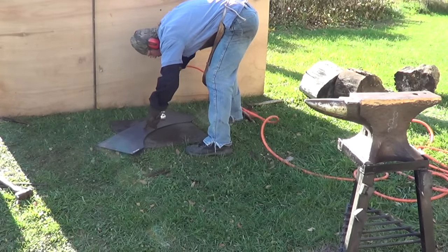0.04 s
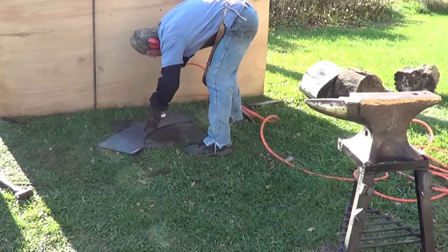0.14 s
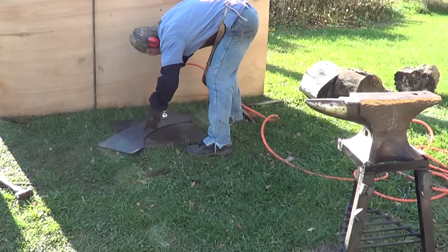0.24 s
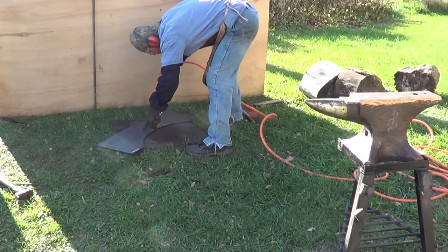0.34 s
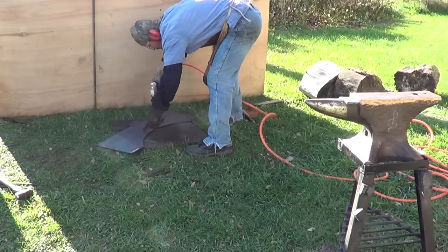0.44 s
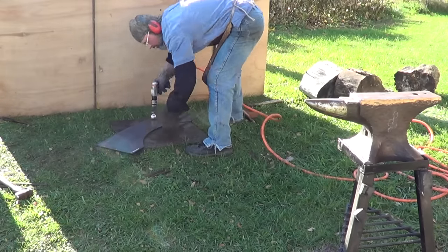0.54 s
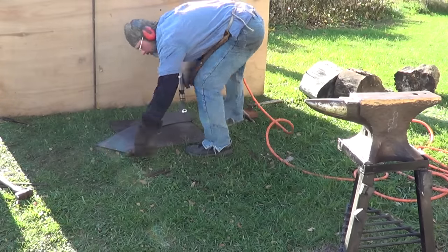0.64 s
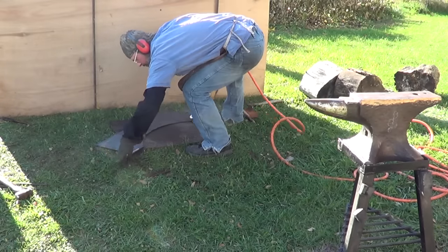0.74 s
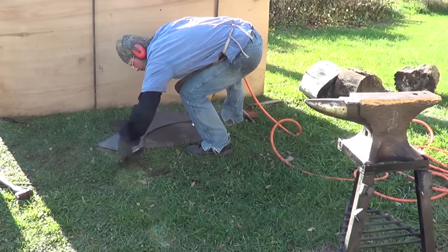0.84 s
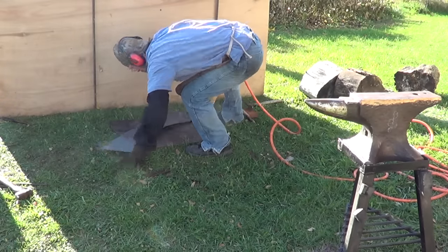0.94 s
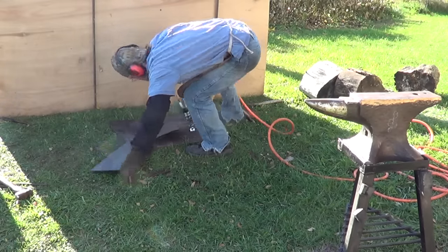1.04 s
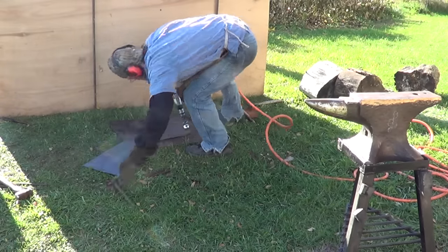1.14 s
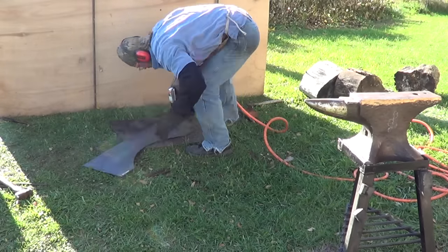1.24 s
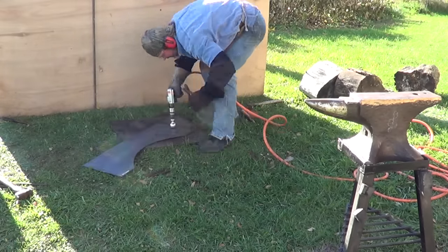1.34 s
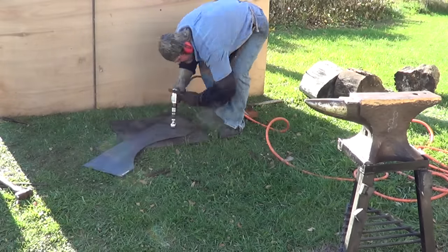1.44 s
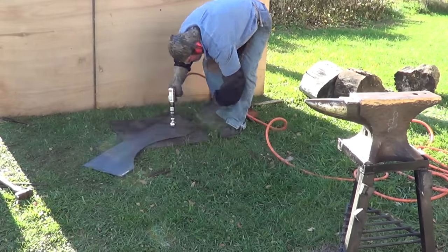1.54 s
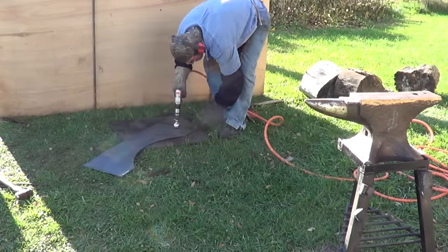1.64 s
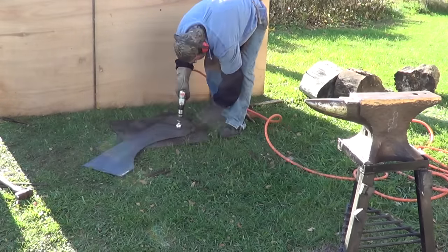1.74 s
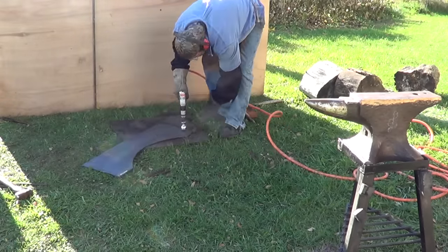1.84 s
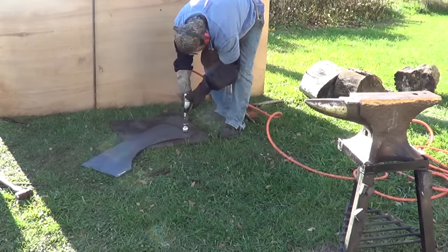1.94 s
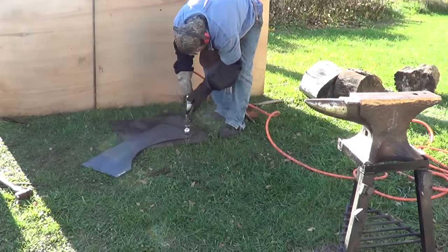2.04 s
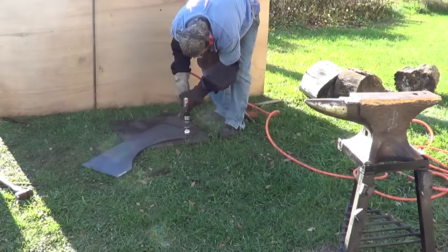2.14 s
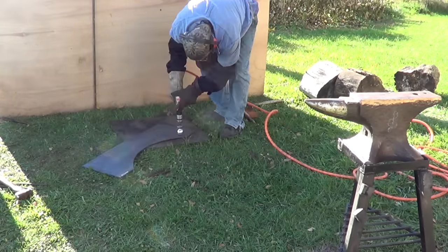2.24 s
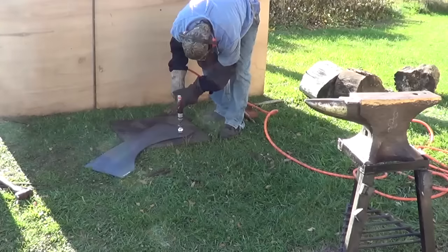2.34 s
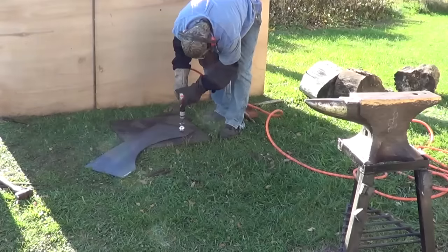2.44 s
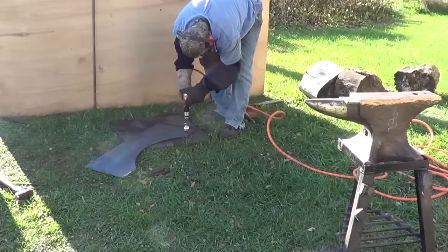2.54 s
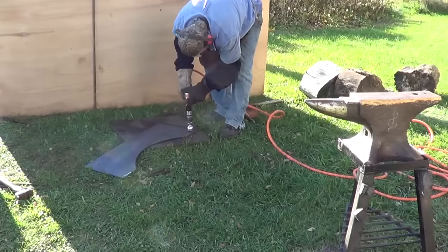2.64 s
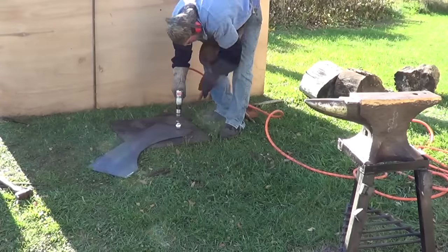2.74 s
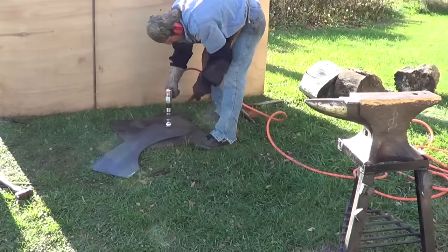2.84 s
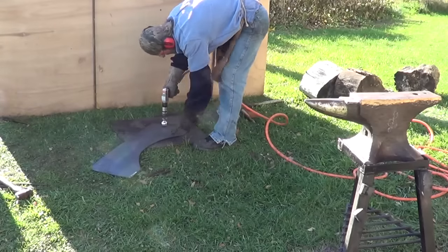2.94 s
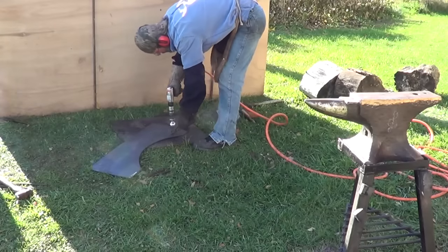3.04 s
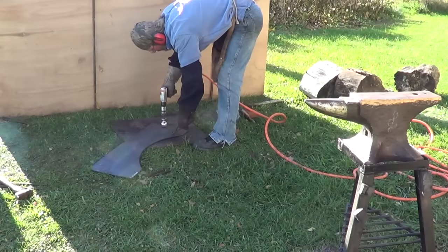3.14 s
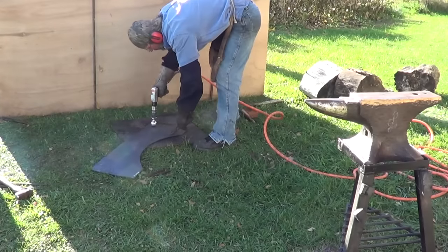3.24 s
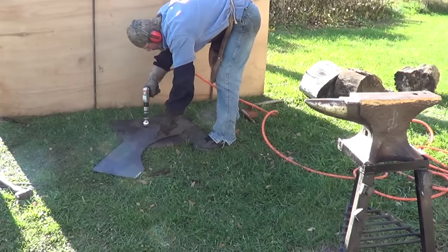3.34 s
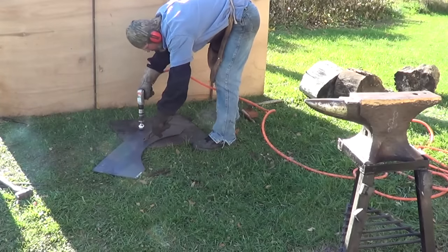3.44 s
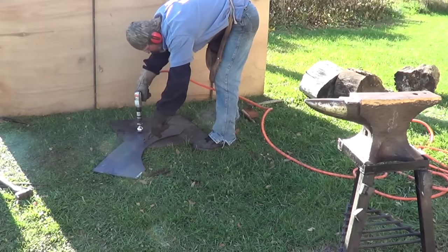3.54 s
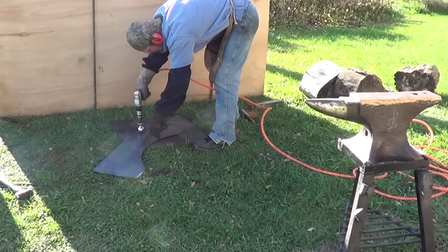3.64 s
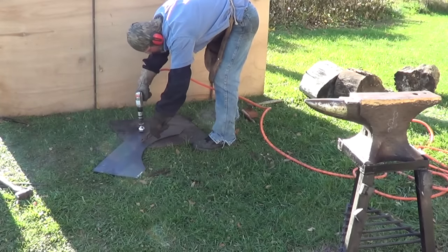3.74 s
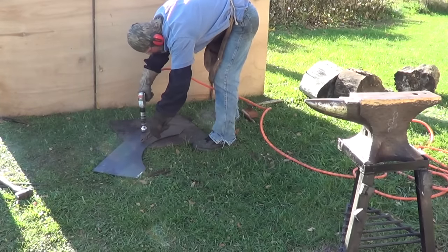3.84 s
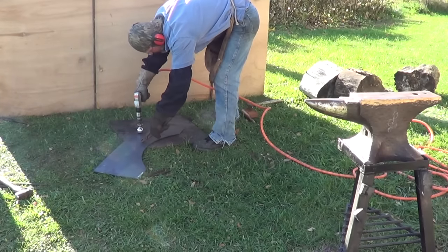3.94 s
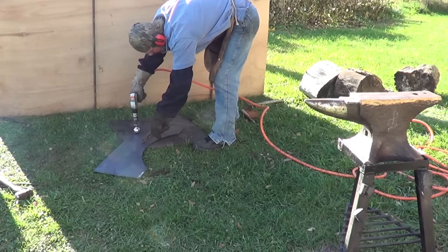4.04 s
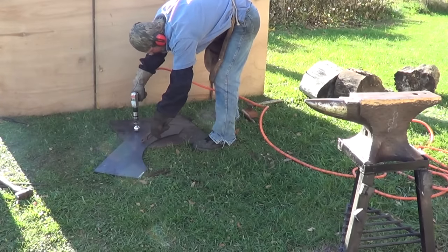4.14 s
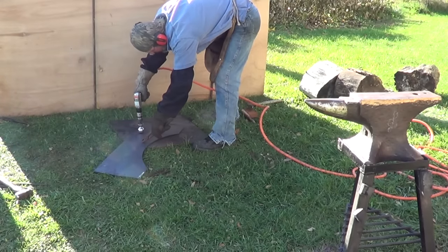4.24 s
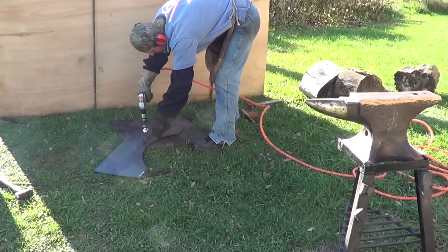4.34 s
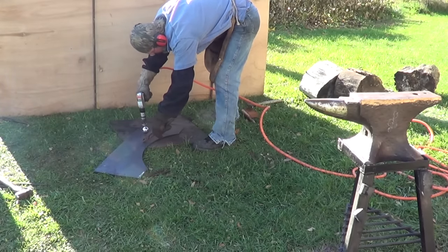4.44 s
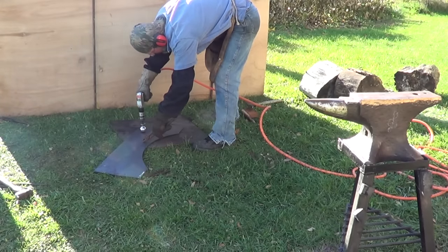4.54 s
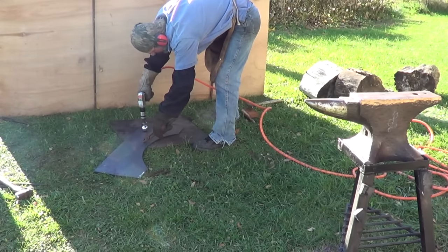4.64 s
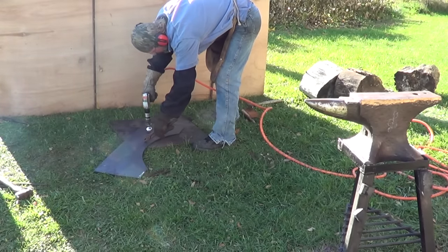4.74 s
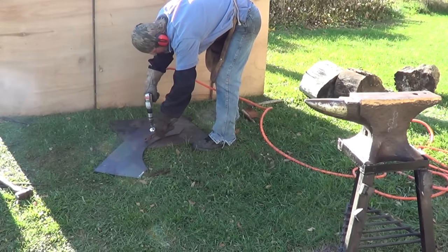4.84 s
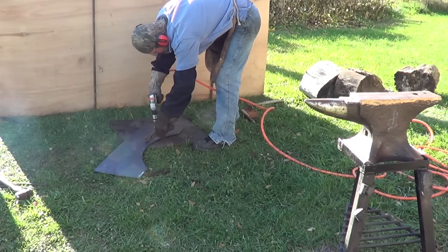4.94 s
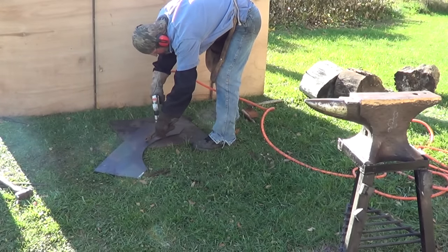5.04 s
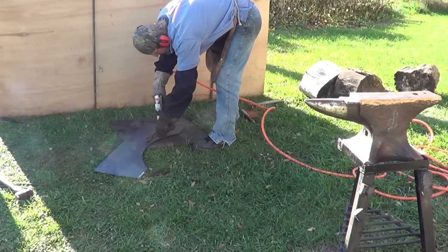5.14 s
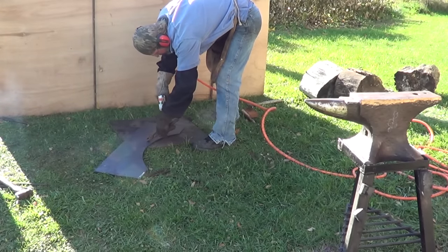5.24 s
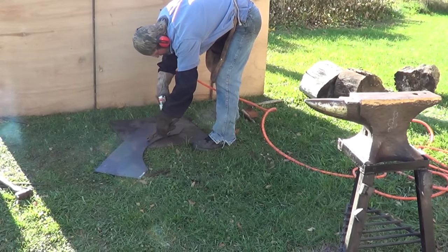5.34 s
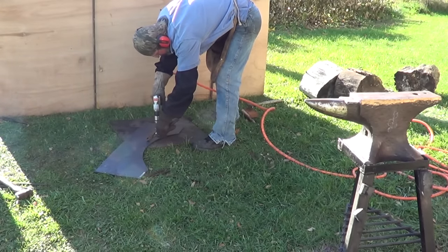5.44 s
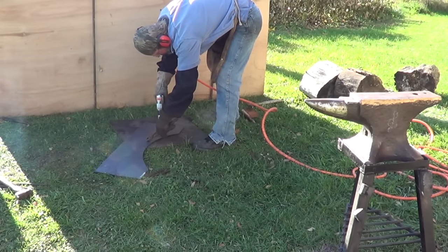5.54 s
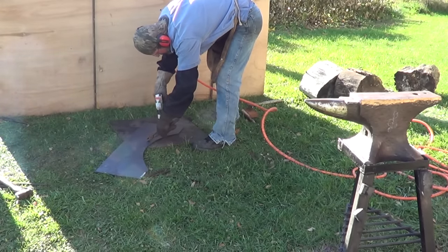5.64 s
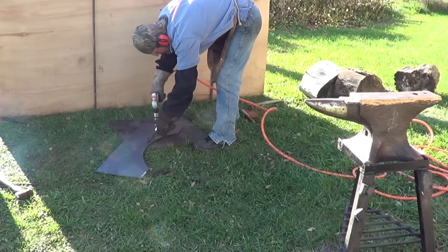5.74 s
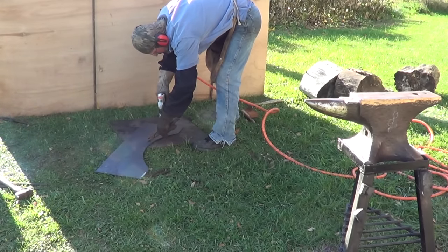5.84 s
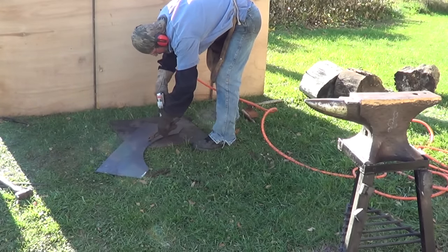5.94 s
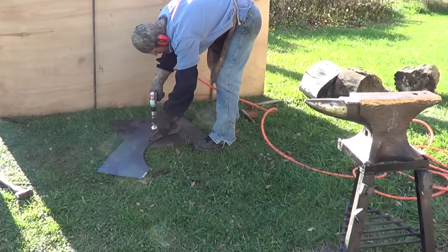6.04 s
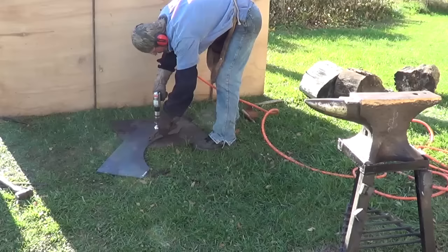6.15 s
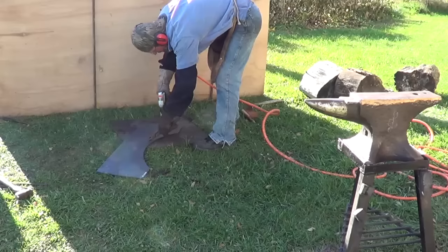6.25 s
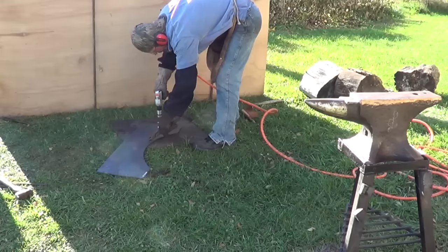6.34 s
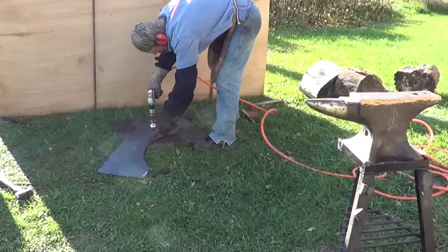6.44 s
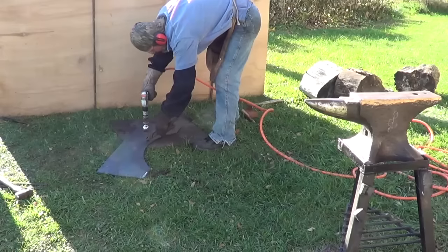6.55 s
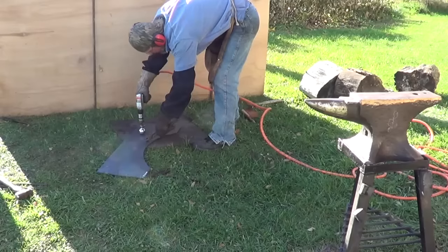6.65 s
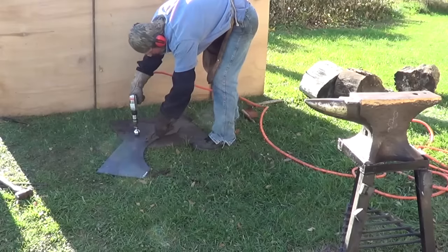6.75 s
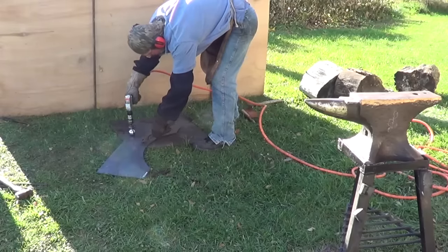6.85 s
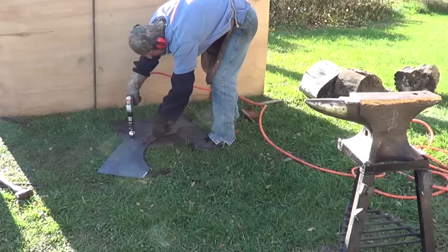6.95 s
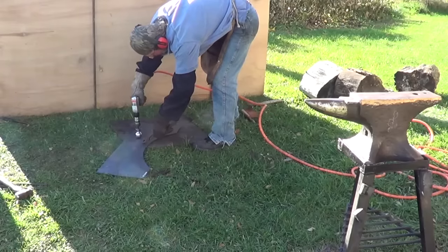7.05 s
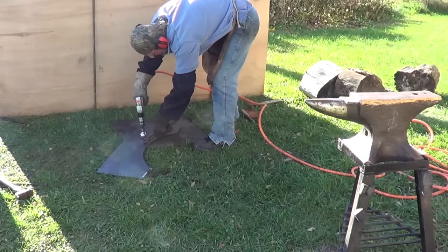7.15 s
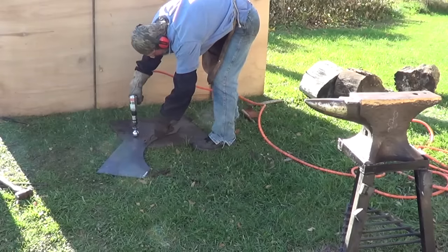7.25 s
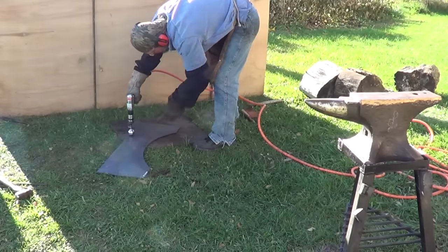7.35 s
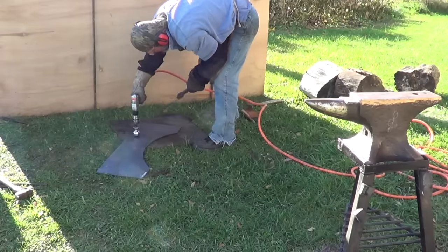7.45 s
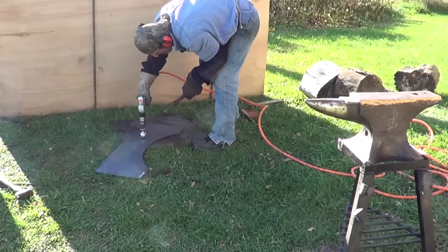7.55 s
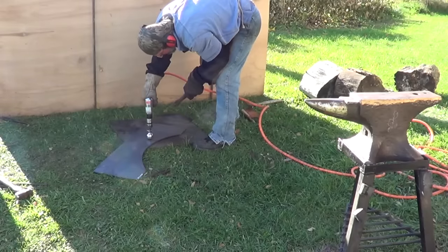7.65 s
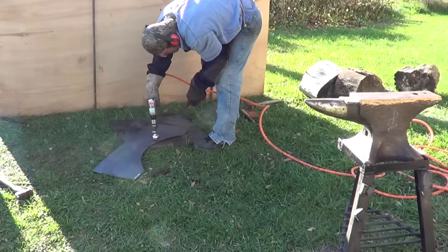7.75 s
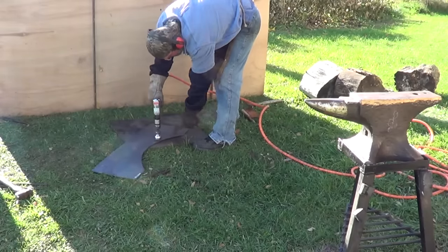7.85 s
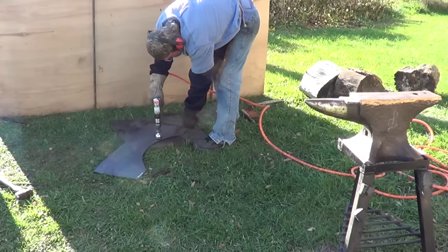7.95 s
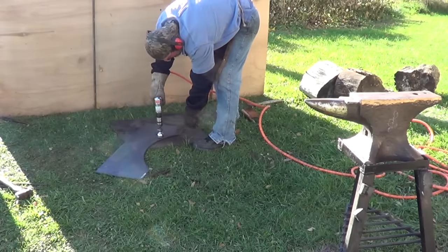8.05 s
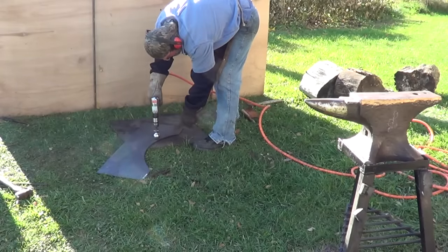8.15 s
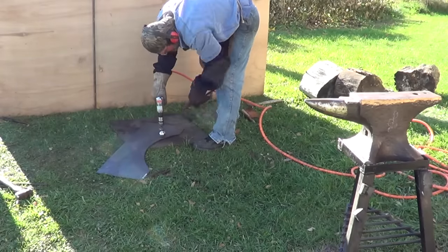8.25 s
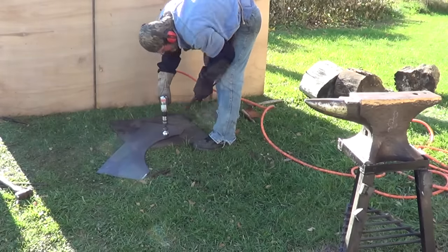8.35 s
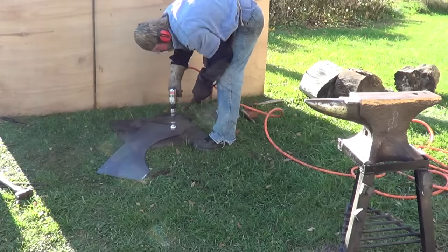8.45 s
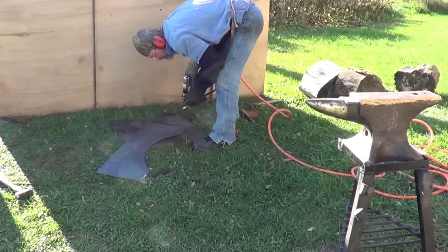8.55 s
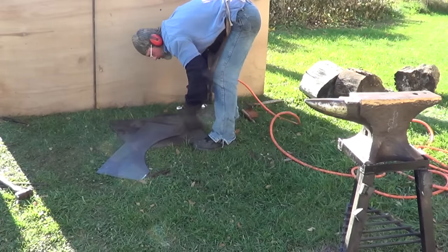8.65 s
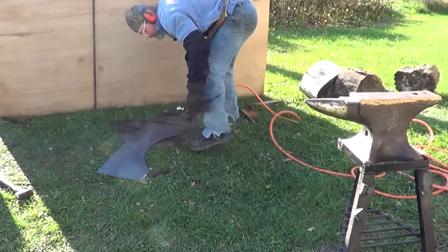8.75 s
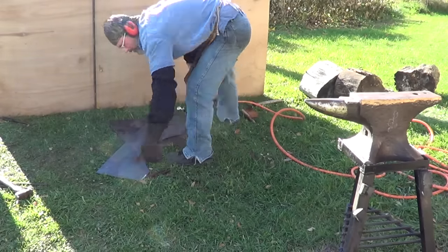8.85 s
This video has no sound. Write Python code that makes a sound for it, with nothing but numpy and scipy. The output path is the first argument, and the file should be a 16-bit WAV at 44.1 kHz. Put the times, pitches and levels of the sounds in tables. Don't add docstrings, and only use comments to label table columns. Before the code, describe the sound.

A short burst of very rapid metal hammering, about two hundred strokes a second, fused into a rough rattling buzz. A pause of about a second follows with faint ticks, a hard scrape and loud clanks of loose sheet steel, while leaking air hisses and hums. The hammering returns, shriller and longer, wavering in tone until it lifts off. Open yard, camera a few metres away.

```python
import sys
import numpy as np
from scipy import signal
from scipy.fft import rfft, irfft
from scipy.io import wavfile
from scipy.ndimage import uniform_filter1d

SR = 44100
rng = np.random.default_rng(int(sys.argv[2]) if len(sys.argv) > 2 else 0)


def wrap_up_sound(samples):
    columns = np.atleast_2d(samples).T
    tamed = np.clip(columns, -1, 1)
    steps = np.round(tamed * 32767).astype(np.int16)
    wavfile.write(sys.argv[1], SR, steps)


def gain_from_db(level_db):
    decades = np.asarray(level_db, float) / 20
    return 10 ** decades


N = 392030
EARLY = slice(0, 2 * SR)


def evened(x):
    return x / np.sqrt(np.mean(x ** 2) + 1e-20)


def read(points, hz):
    f, value = np.transpose(points)
    return np.interp(np.log(hz + 1), np.log(f + 1), value)


def curve(rows):
    return np.interp(np.arange(N) / SR, *np.transpose(rows))


def span(start_s, end_s, level_db, fade_db=0):
    t = np.arange(N) / SR
    progress = np.clip((t - start_s) / (end_s - start_s), 0, 1)
    return ((t >= start_s) & (t < end_s)) * gain_from_db(level_db + fade_db * progress)


def drift(top_hz, count=1, lowest=.1):
    t = np.arange(0, N + 128, 64) / SR
    hz = np.geomspace(lowest, 1, 24) * top_hz
    phase = hz[:, None] * t + rng.random((count, 24, 1))
    waves = np.sin(2 * np.pi * phase) / np.sqrt(hz)[:, None]
    return np.array([np.interp(np.arange(N) / SR, t, evened(w)) for w in waves.sum(1)])


def stack(orders, turns, flutter_db, scatter=1):
    waver = gain_from_db(flutter_db * drift(85, count=6))[:, :len(turns)]
    out = np.zeros(len(turns))
    for j, (order, level_db) in enumerate(orders):
        sine = np.sin(2 * np.pi * (order * turns + scatter * rng.random()))
        out += gain_from_db(level_db) * waver[j % 6] * sine
    return evened(out)


def ring(drive, hz, width_hz):
    r = np.exp(-np.pi * 1.25 * width_hz / SR)
    pole = [1, -r * np.exp(2j * np.pi * hz / SR)]
    return 2 * signal.lfilter([(1 - r) ** 2], np.convolve(pole, pole), drive).real


def ports(x, lean, lead):
    hz, sides = np.fft.rfftfreq(N, 1 / SR), np.array([[.5], [-.5]])
    turned = np.exp(1j * sides * read(lead, hz))
    return irfft(rfft(x) * gain_from_db(sides * read(lean, hz)) * turned, N)


# freq_hz, likeness_0_to_1
PORT_LIKENESS = [(60, .98), (180, 0.57), (550, 0.93), (1650, 0.9), (4970, 0.82), (8500, 0.9), (15000, 0.73)]
# freq_hz, left_minus_right_db
PORT_LEAN = [(60, 0.0), (180, -0.45), (550, -0.2), (1650, -0.75), (4000, -1.4), (8000, 0.91), (15000, 1.3)]


def pair(frames, hz):
    a, b, c, d = rng.standard_normal((frames, len(hz), 4)).T
    same = np.clip(read(PORT_LIKENESS, hz), 0, 1)[:, None]
    lean = gain_from_db(read(PORT_LEAN, hz) / 2)[:, None]
    left = a + 1j * b
    right = same * left + np.sqrt(1 - same ** 2) * (c + 1j * d)
    return np.array([left * lean, right / lean])


def noise(points, share=1, streak_db=0):
    hz, frames = np.fft.rfftfreq(1024, 1 / SR), N // 256 + 5
    streaks = uniform_filter1d(rng.standard_normal((len(hz), frames)), size=140, axis=1)
    streaks = evened(uniform_filter1d(streaks, size=40, axis=1))
    depth_db = streak_db * np.clip(hz / 3000, .3, 1)[:, None]
    z = pair(frames, hz) * (gain_from_db(read(points, hz)) * share)[:, None] * gain_from_db(depth_db * streaks)
    return evened(signal.istft(z, nperseg=1024, noverlap=768)[1][:, :N])


# start_s, end_s, force_db, shrillness_db
BURSTS = [
    (0, 0.593, -17.5, 1.5),
    (1.859, 8.527, -19.5, 3.5),
]


def camera_gain_db():
    duck_db, release_db, creep_db_per_s, duck_s = -19, -11.5, 12.5, .004
    t = np.arange(N) / SR
    quiet = sum(span(a, b, 0) for a, b, *_ in BURSTS) == 0
    since_s = t - np.maximum.accumulate(t * ~quiet)
    keep = np.exp(-1 / (duck_s * SR))
    target_db = quiet * (release_db - duck_db + creep_db_per_s * since_s)
    return duck_db + signal.lfilter([1 - keep], [1, -keep], target_db)


# time_s, rate_hz
HUM_HZ = [(0, 231.25), (2, 231.25), (8.9, 231.5)]
# order, level_db
BUZZ_PARTIALS = [(1, -16), (2, -5), (3, -17), (4, -5), (5, -9), (6, -8), (7, -5), (8, 0), (9, -11),
                 (10, -6), (11, -7), (12, -20), (13, -4), (14, -9), (15, -8), (16, -9), (17, -17), (18, -9),
                 (19, -9), (20, -13), (21, -16), (22, -14), (23, -16), (24, -10), (25, -14), (26, -15),
                 (28, -15), (29, -18), (31, -11), (35, -15), (36, -16), (38, -16), (41, -13)]
# freq_hz, density_db_per_hz
HISS = [(25, -29), (60, -25), (130, -11.5), (300, -10.5), (600, -9), (927, -6), (1510, -8.5), (1880, -4),
        (2820, -9.5), (6000, -8), (10400, -8), (12500, -13), (15200, -15.5), (16500, -20)]
# freq_hz, width_hz, level_db
HAZY_TONES = [(5630, 90, -47), (7170, 60, -57), (9480, 60, -53)]
# time_s, level_db
VALVE_LINE_DB = [(0, -62), (8.9, -47)]
# freq_hz, left_minus_right_db
HUM_LEAN = [(60, -0.5), (130, 0.0), (290, -0.5), (640, -0.5), (1410, -1.0), (3100, -5.5), (6820, -5.5),
            (15000, -3.5)]
# freq_hz, left_lead_rad
HUM_LEAD = [(0, 0), (1810, -0.1), (2070, 0.5), (2330, -0.0), (7490, 0.1), (7750, 0.5), (10900, -0.4),
            (16500, 0.2)]


def air_supply():
    turns = np.cumsum(curve(HUM_HZ)) / SR
    hiss = gain_from_db(-43.0) * noise(HISS) * (1 + 0.13 * np.cos(2 * np.pi * turns))
    for hz, width_hz, level_db in HAZY_TONES:
        hiss = hiss + gain_from_db(level_db + 18) * ring(rng.standard_normal(N), hz, width_hz)
    buzz = gain_from_db(-37.0) * stack(BUZZ_PARTIALS, turns + 0.0015 * drift(30)[0], 0.37)
    buzz += gain_from_db(curve(VALVE_LINE_DB)) * np.sin(2 * np.pi * 17.5 * turns)
    return gain_from_db(camera_gain_db()) * (hiss + ports(buzz, HUM_LEAN, HUM_LEAD))


# time_s, share_0_to_1
ROCKING = [(0, .2), (2.3, .25), (2.9, .6), (3.15, 1), (3.8, .85), (4.4, .6), (5.2, .5), (6.7, .55),
           (7.0, .6), (7.7, .4), (8.6, .4)]


def bounce():
    rocking = evened(ring(rng.standard_normal(N), hz=30.5, width_hz=7))
    return curve(ROCKING) * (np.minimum(rocking - .4, 0) + 0.5)


# time_s, depth_db
SKIPS = [
    (2.18, -2),
    (3.122, 6),
    (3.16, 6),
    (3.207, 4),
    (3.245, 4),
    (6.388, 24),
    (7.32, 4),
    (8.47, 0),
]


def skips():
    seat_s, half_length_s = 0.0072, .006
    t = np.arange(N) / SR
    seating = 4.0 * np.exp(-abs(t - BURSTS[-1][0]) / seat_s)
    return seating + sum(db * np.exp(-((t - s) / half_length_s) ** 2) for s, db in SKIPS)


# time_s, lean_db
LEANING = [(0, 4), (1.865, 6), (1.96, -3), (2.23, -2.5), (2.29, 4.5), (2.34, -1), (2.65, -0.5), (2.95, 3),
           (4.0, 3), (4.5, 6), (5.1, 1.5), (5.6, 2.5), (6.4, 7.5), (6.85, 3), (7.6, 6.5), (7.8, 0),
           (8.52, -1)]
# time_s, shrill_db
TILT = [(0, 1), (.35, 4), (.58, 4.5), (1.86, 2), (2.3, 1), (2.9, 2), (3.2, 1), (3.7, 3), (4.4, -0.5),
        (5.1, 2), (5.5, -1), (6.0, 1), (6.7, 2), (7.55, 1.5), (7.68, 3), (7.95, 1.5), (8.05, 3), (8.53, 1)]
# start_s, end_s, thud_db, fade_db, low_rattle_db
STANCES = [
    (0, .575, -32, -9, -29),
    (1.862, 2.3, -34, 0, -37.5),
    (2.3, 8.527, -35, 0, -29.5),
]


def bit_force(rocking):
    force_per_db, shrill_per_db, weight_per_db = 0.1666, -0.07, -0.24
    wobble_db, shrill_wobble_db, skip_shrill = -0.9, 2, 1.4
    lean, skip = curve(LEANING), skips()
    wobble = -np.maximum(drift(45, count=2, lowest=0.45), 0)
    middle_db = force_per_db * lean - skip + wobble_db * wobble[0] + 0.25 * rocking
    shrill_db = curve(TILT) + 0.8 * rocking + shrill_per_db * lean - skip_shrill * skip
    shrill_db += shrill_wobble_db * (wobble[0] + .5 * wobble[1])
    low_db = weight_per_db * lean + 3.5 * rocking
    return [gain_from_db(middle_db) * sum(span(a, b, db) for a, b, db, _ in BURSTS),
            gain_from_db(shrill_db) * sum(span(a, b, db + up_db) for a, b, db, up_db in BURSTS),
            gain_from_db(low_db) * sum(span(a, b, rattle_db) for a, b, _, _, rattle_db in STANCES)]


# freq_hz, left_minus_right_db
TOOL_LEAN = [(60, 0.0), (150, 0.0), (380, -1.4), (950, -0.86), (2380, -1.9), (5980, 0.94), (15000, 1.0)]
# freq_hz, left_lead_rad
TOOL_LEAD = [(0, -0.3), (1550, -0.45), (2410, -0.48), (9910, 0.0), (10300, -0.26), (11600, -0.35),
             (16500, 0.11)]
# order, level_db
THUD_PARTIALS = [
    [(1, -40), (2, -26), (3, -7.5), (4, -8.5), (5, -32), (6, -7.5), (7, 0.5), (8, -5.5), (9, -4), (10, -3),
     (11, -18), (12, -4)],
    [(1, -32), (2, -14), (3, -11), (4, 1.5), (5, 2), (6, 0), (7, -21), (8, 1), (9, 1.5), (10, -13),
     (11, -1), (12, -7), (13, -4), (14, -9)],
    [(1, -51), (2, -14), (3, -11.5), (4, -19), (5, 3), (6, 7.5), (7, 10.5), (8, -7), (9, 2), (10, 0),
     (11, -10), (12, -6), (13, -12), (14, -7), (15, -8)],
]


def piston(turns, rocking):
    shaken, out = turns + 0.012 * drift(60)[0], np.zeros(N)
    for row, orders in zip(STANCES, THUD_PARTIALS):
        part = slice(round(row[0] * SR), round(row[1] * SR))
        out[part] += span(*row[:4])[part] * stack(orders, shaken[part], 1.7, scatter=.12)
    wobble_db = -0.06 * drift(60, lowest=0.55)[0]
    return out * gain_from_db(curve(LEANING) + wobble_db + 6 * rocking - 6.5)


def chatter(turns):
    stroke = turns.astype(int)
    strength_db = 0.056 * rng.standard_normal(stroke[-1] + 1)[stroke] + 0.041 * drift(140)[0]
    after_blow = .27 + np.exp(-(turns % 1) / .2)
    rattle = (rng.random(N) < 3000 / SR) * np.clip(rng.standard_normal(N), -2, 2)
    rattle += 1.25 * np.diff(stroke, prepend=0)
    return evened(gain_from_db(strength_db) * after_blow * rattle)


# freq_hz, density_db_per_hz
PLATE_SPECTRUM = [(25, -57), (100, -57), (300, -37), (600, -39), (850, -15.5), (1100, -21), (1600, -21),
                  (2200, -16.5), (3300, -6.5), (4500, -3), (6200, -4), (7500, 1), (14000, -6.5),
                  (16500, -5.5)]
PLATE_T60_S = (0.1, 0.083, 0.16)
BAND_EDGES_HZ = (2500, 10500)


def dense_modes(drives):
    hz = np.fft.rfftfreq(1024, 1 / SR)
    low = 1 / (1 + (hz / BAND_EDGES_HZ[0]) ** 8)
    high = 1 - 1 / (1 + (hz / BAND_EDGES_HZ[1]) ** 16)
    bands = []
    for drive, share, t60_s in zip(drives, (1 - low - high, high, low), PLATE_T60_S):
        power = drive ** 2
        keep = np.exp(-2 * np.log(1000) / (t60_s * SR))
        stored = signal.lfilter([1 - keep], [1, -keep], power, zi=[np.mean(power[:2000])])[0]
        tick = 0.097 * uniform_filter1d(power, size=12)
        streaked = noise(PLATE_SPECTRUM, np.sqrt(abs(share)), streak_db=2.8)
        bands.append(np.sqrt(abs(stored + tick)) * streaked)
    no_bass = signal.butter(3, 450, "high", fs=SR, output="sos")
    return signal.sosfilt(no_bass, sum(bands))


# freq_hz, width_hz, level_db
FIRST_RINGS = [(2120, 120, -6), (3205, 70, -2), (3608, 55, -1), (4010, 90, -4), (4520, 55, -4),
               (4665, 50, -6), (5580, 170, -1), (6238, 57, -5), (6700, 110, -4), (7290, 80, -4),
               (7830, 69, -2), (8080, 50, -7), (8595, 55, -6), (9260, 32, -2), (11000, 71, -10),
               (12000, 110, 0), (13400, 230, 0), (14100, 99, -1)]


def first_rings(blows):
    return sum(gain_from_db(db + 13.5) * ring(blows[EARLY], hz, width) for hz, width, db in FIRST_RINGS)


# freq_hz, density_db_per_hz
GROUND = [(25, -15), (150, -9.5), (350, -6), (600, -11), (1200, -38)]


def ground(drive):
    return gain_from_db(-45.5) * uniform_filter1d(drive, size=3000) * noise(GROUND)


# start_s, end_s, freq_hz, width_hz, level_db
CATCHES = [(.08, 0.27, 8500, 70, -5), (0.3, 0.66, 14100, 100, -4), (0.48, 0.53, 12000, 120, -8),
           (0.15, 0.66, 9300, 90, -8), (2.1, 4.1, 26000, 130, -2), (1.83, 3.0, 3250, 66, -9),
           (1.74, 2.85, 4510, 45, -4.5), (3.13, 3.7, 3200, 48, -7), (7.95, 8.45, 3300, 72, -7),
           (1.9, 2.9, 8300, 89, -5), (2.2, 3, 13000, 70, -1), (1.92, 3.52, 6800, 75, -0.5),
           (2.8, 3.47, 9320, 70, -4), (3.3, 4.2, 10950, 64, -5.5), (3.6, 5.1, 10950, 70, -4.5),
           (6.5, 7.2, 10970, 50, 2), (3.7, 4.6, 4600, 170, -8), (8.35, 8.6, 4390, 61, -6),
           (8.3, 8.6, 6830, 70, -1), (5.0, 7.7, 3360, 48, -7), (6.1, 7.6, 4630, 200, -7.5),
           (5.4, 6.7, 14200, 98, -6), (7.3, 7.68, 9320, 43, 2), (7.62, 7.95, 13000, 130, 3),
           (7.7, 8.0, 12800, 220, 2), (6.9, 8.3, 13550, 160, -4), (7.62, 7.9, 11000, 80, 6),
           (7.1, 8.3, 17000, 180, -10), (3.5, 4.4, 12000, 90, -3), (4.8, 4.8, 11780, 62, -5)]


def catches(blows):
    fade_s, out = 0.11, np.zeros(N)
    for start_s, end_s, hz, width_hz, level_db in CATCHES:
        part = slice(round(start_s * SR), round(end_s * SR) + 4000)
        t = np.arange(part.start, part.stop) / SR
        held = np.clip(np.minimum(t - start_s, end_s - t) / fade_s, 0, 1)
        out[part] += gain_from_db(level_db + 17.0) * ring(blows[part] * held, hz, width_hz)
    return out


# time_s, peak_db, shrillness_db, weight_db, ring_hz
KNOCKS = [(0.737, -30.5, 3, 3, 2770), (0.746, -39, -2, -6, 5700), (0.8735, -26, 3, -6, 8460),
          (0.9694, -36, -20, -6, 5800), (1.032, -22, -16, -16, 5700), (1.042, -22.5, -13, -14, 4180),
          (1.054, -28, -9, -14, 7200), (1.0655, -27, -13, -19, 9000), (1.0755, -19, -19, -12, 2680),
          (1.088, -16, -1, -2, 6400), (1.098, -26, -2, -9, 4500), (1.184, -4.5, -1, -10, 3210),
          (1.199, -8, -4, -7, 3250), (1.227, -11, 3, -10, 6850), (1.245, -10, 4, -10, 9800),
          (1.3657, -13, 2, -12, 9150), (1.371, -22, 0, -10, 9800), (1.401, -13, 2, -6, 9000),
          (1.417, -32, 2, -6, 13800), (1.5344, -28, 7, -20, 11600), (1.61, -20.5, -4, -16, 12900),
          (1.6464, -23, -1, -6, 7200), (1.688, -21.5, -10, 0, 7200), (1.706, -29, -8, -6, 7200),
          (1.8628, -18, 6, 0, 13000), (1.7194, -30, -20, -7, 3380)]


def knock_ticks(band):
    out, t = np.zeros(N), np.arange(4000) / SR
    for time_s, peak_db, shrill_db, weight_db, _ in KNOCKS:
        blow = rng.standard_normal(4000) * np.exp(-t / 0.0027)
        blow[0] = 7
        level_db = peak_db - 5.0 + (0, shrill_db, weight_db)[band]
        out[round(time_s * SR):][:4000] += gain_from_db(level_db) * blow
    return out


def knock_rings():
    out, impulse = np.zeros(N), signal.unit_impulse(4000)
    for time_s, peak_db, _, _, hz in KNOCKS:
        level_db = peak_db - 5.0 + 45.5 - 0.3 * hz / 1000
        out[round(time_s * SR):][:4000] += gain_from_db(level_db) * ring(impulse, hz, width_hz=51)
    return out


# start_s, length_s, force_db, fade_db, shrillness_db
SCRAPES = [
    (1.024, 0.035, -37, -2, 0),
    (1.16, 0.011, -36, 0, -6),
    (1.183, 0.068, -15.5, -3.5, 0),
]


def scrape():
    grit_per_s, weight_db = 2300, -9
    grit = rng.standard_normal(N) * (rng.random(N) < grit_per_s / SR) * np.sqrt(SR / grit_per_s)
    force = [[span(s, s + length_s, db + up_db, fade_db) for up_db in (0, shrill_db, weight_db)]
             for s, length_s, db, fade_db, shrill_db in SCRAPES]
    return grit * np.sum(force, axis=0)


# freq_hz, width_hz, level_db
LOOSE_RINGS = [(900, 165, -8), (2110, 22, 5), (3210, 60, 0), (6850, 130, -4), (7360, 39, -6),
               (7560, 48, -11), (8180, 32, -18), (8580, 43, -13)]


def loose_rings(handling):
    return sum(gain_from_db(db + 13.0) * ring(handling[EARLY], hz, width) for hz, width, db in LOOSE_RINGS)


# freq_hz, width_hz, level_db
RINGS = [(2120, 55, -10), (3600, 59, -12), (4430, 240, -7), (5570, 66, -5), (6020, 45, -11), (6980, 53, -7),
         (7270, 48, -3), (7550, 63, -5), (7970, 65, -6), (8590, 98, -6), (9320, 66, 4.5), (10000, 67, -5),
         (10980, 62, -1), (11400, 81, -9), (11800, 88, -5), (12200, 160, -8), (12700, 120, -7),
         (13000, 140, -6), (13600, 99, -13), (14200, 110, -3), (14800, 92, -9), (15400, 260, -7)]
# trend_db, bow_db
COUPLING = [(-1, 6.5), (-9, -10), (1, 1.5), (2.5, -3.5), (22, -19), (1, 8.5), (-5, -11), (4, 5), (5, -2),
            (1, -4), (3.5, -6), (-2, -28), (-3, -19), (7, -22), (-11, -10), (9, -10), (-8, -1), (1, 4),
            (-5, 2), (-6, 6), (10, -3), (-6, 0)]


def travelling_rings(blows, rocking):
    travel = (np.arange(N) / SR - 5.2) / 3.3
    swell = gain_from_db(0.57 * drift(11, count=len(RINGS), lowest=0.0288))
    pressed = blows * gain_from_db(0.2 * curve(LEANING) + 4 * rocking)
    out = np.zeros(N)
    for (hz, width_hz, level_db), (trend_db, bow_db), gain in zip(RINGS, COUPLING, swell):
        coupling = gain_from_db(level_db + 15.5 + trend_db * travel + bow_db * travel ** 2) * gain
        out += ring(pressed * coupling, hz, width_hz)
    return out


# peak_time_s, level_db
FLARES = [(1.961, -34), (2.031, -41), (2.079, -38), (2.278, -34), (2.352, -33), (2.447, -33), (2.534, -34),
          (2.711, -32), (2.808, -30), (2.915, -31), (2.937, -30), (3.086, -30), (3.356, -31), (3.391, -31),
          (3.463, -30), (3.624, -28), (3.928, -35), (4.318, -28), (4.34, -25), (4.434, -32), (4.534, -32),
          (4.575, -29), (4.705, -40), (5.159, -30), (5.248, -37), (5.282, -42), (5.369, -30), (5.462, -38),
          (5.63, -30), (5.941, -29), (6.122, -35), (6.169, -28), (6.297, -38), (6.364, -27), (6.475, -30),
          (6.665, -28.5), (6.901, -36), (6.951, -30), (6.996, -30), (7.133, -31), (7.19, -29), (7.429, -25),
          (7.508, -24), (7.621, -25), (7.823, -33), (7.848, -30), (7.901, -35), (8.002, -28), (8.027, -31),
          (8.059, -36), (8.164, -38), (8.189, -28), (8.224, -30), (8.278, -39), (8.305, -28), (8.334, -23),
          (8.409, -38), (8.496, -24.5)]


def flares():
    hz, width_hz = 2117, 30
    peak_s = 1 / (np.pi * 1.25 * width_hz)
    blows = np.zeros(N)
    for time_s, level_db in FLARES:
        blows[round((time_s - peak_s) * SR)] = gain_from_db(level_db)
    return ring(blows, hz, width_hz) * np.e * peak_s * SR / np.sqrt(2)


# freq_hz, level_db, t60_s
LIFTED = [(2140, -28, .33), (2118, -31, .25), (4387, -25, .16), (4657, -32, .13), (6831, -31, .13),
          (7160, -37, .3), (9464, -33, .12)]


def lift_ring():
    t = np.maximum(np.arange(N) / SR - BURSTS[-1][1], 0)
    return sum(gain_from_db(db - 60 * t / t60_s) * np.sin(2 * np.pi * hz * t) for hz, db, t60_s in LIFTED)


def plate(turns, drive, rocking):
    blows, first = chatter(turns), np.arange(N) / SR < 1
    chisel = [blows * gain for gain in drive]
    handling = [grit + knock_ticks(band) for band, grit in enumerate(scrape())]
    strong = catches(chisel[0]) + knock_rings() + gain_from_db(4.0) * flares() + lift_ring()
    strong[EARLY] += first_rings(chisel[0] * first) + loose_rings(handling[0])
    strong += travelling_rings(chisel[0] * ~first, rocking)
    freer = gain_from_db(-2.5 * first)
    dense = dense_modes([a * freer + b for a, b in zip(chisel, handling)])
    return gain_from_db(-4.5) * (dense + ports(gain_from_db(-1.05) * strong, TOOL_LEAN, TOOL_LEAD))


# time_s, strokes_per_s
SPEED = [(0, 195), (.46, 195), (.6, 205), (1.858, 214), (1.885, 216), (1.91, 222), (2.0, 213.5), (2.1, 209),
         (2.285, 208), (2.32, 201), (2.5, 198), (2.8, 197), (4, 195.2), (4.7, 193.2), (6.5, 192),
         (8.9, 190.2)]


def scene():
    turns, rocking = np.cumsum(curve(SPEED)) / SR, bounce()
    drive = bit_force(rocking)
    thud = ports(piston(turns, rocking), TOOL_LEAN, TOOL_LEAD)
    return thud + plate(turns, drive, rocking) + ground(drive[0]) + air_supply()


def roll_off(x):
    return signal.sosfilt(signal.butter(12, 16970, fs=SR, output="sos"), x)


def record(dry):
    ceiling = .85
    edge = signal.firwin(511, 15800, window=("kaiser", 4.2), fs=SR)
    limited = ceiling * np.tanh(dry / ceiling)
    return roll_off(signal.oaconvolve(limited, edge[None], "same", axes=1))


dry = scene()
out = record(dry)
wrap_up_sound(out)
```